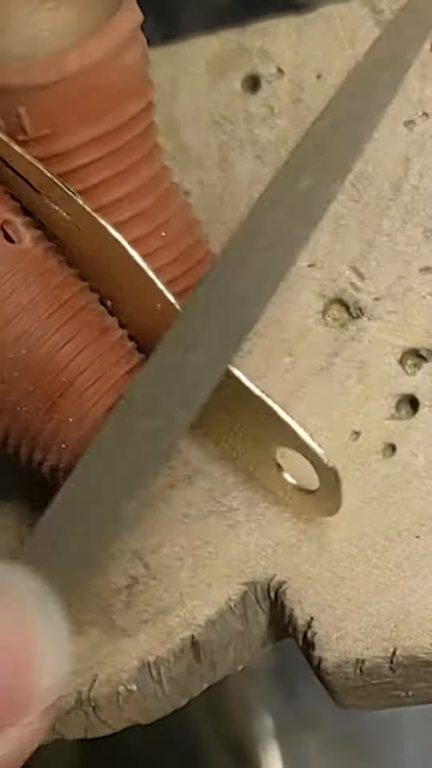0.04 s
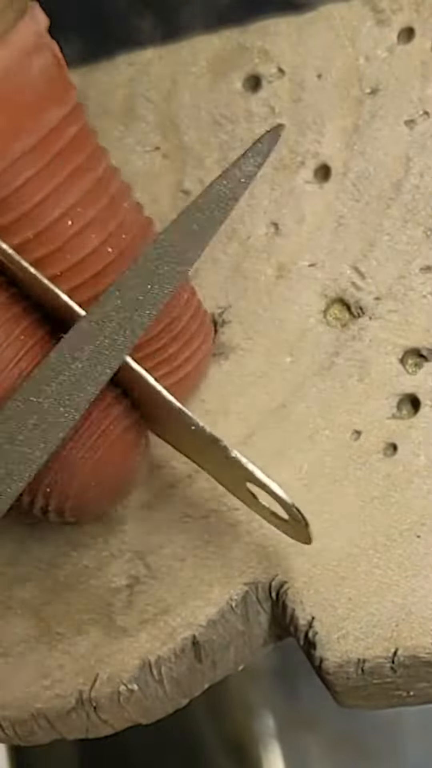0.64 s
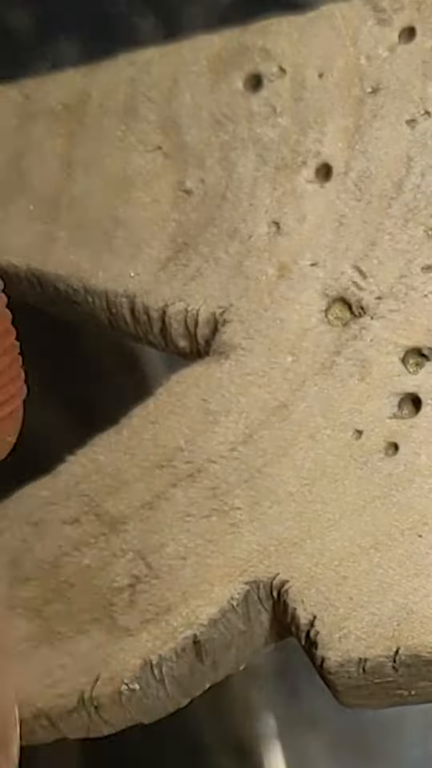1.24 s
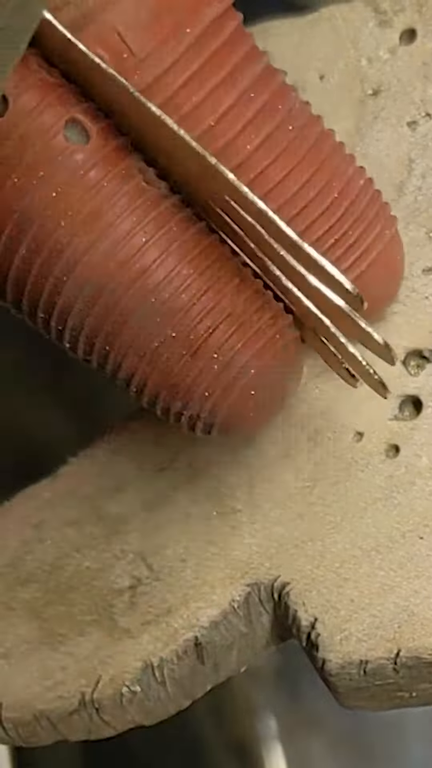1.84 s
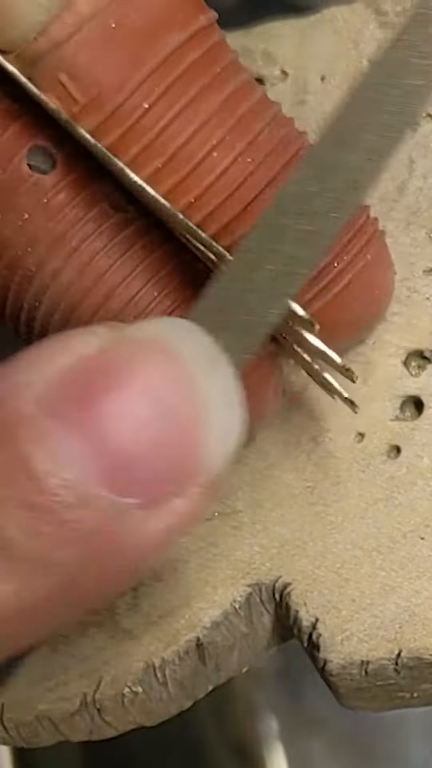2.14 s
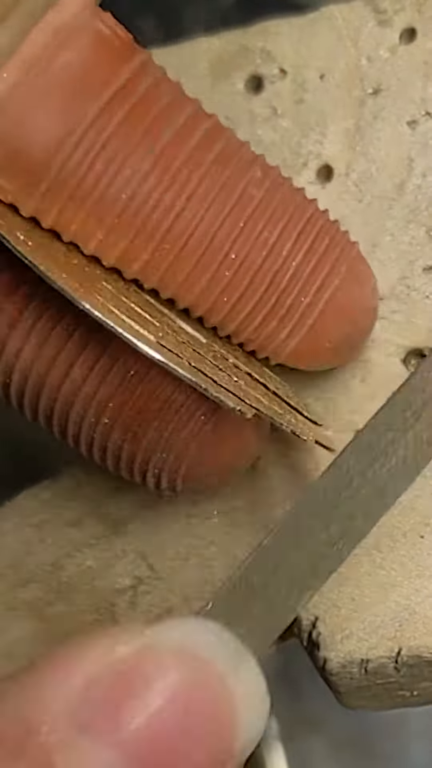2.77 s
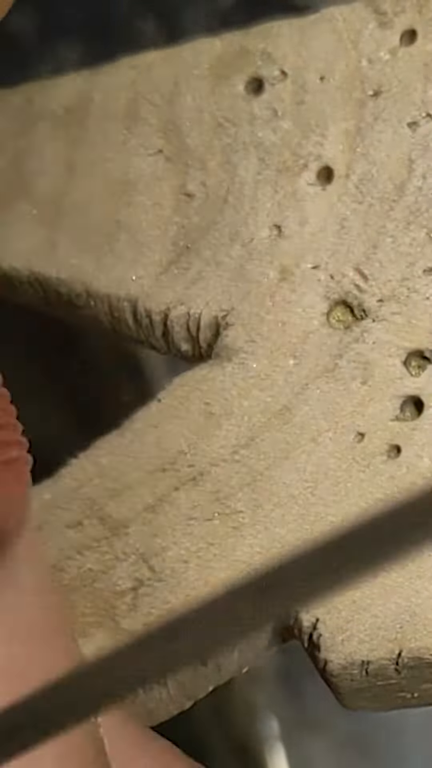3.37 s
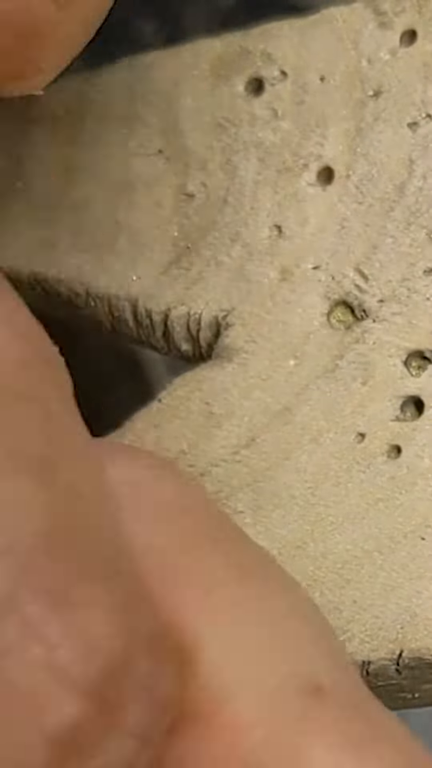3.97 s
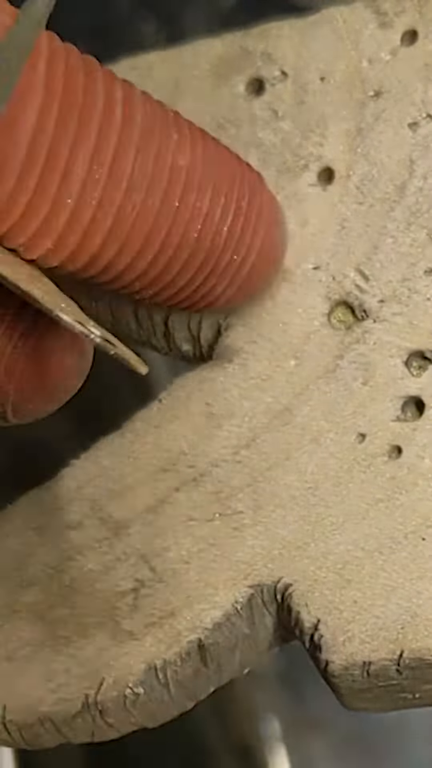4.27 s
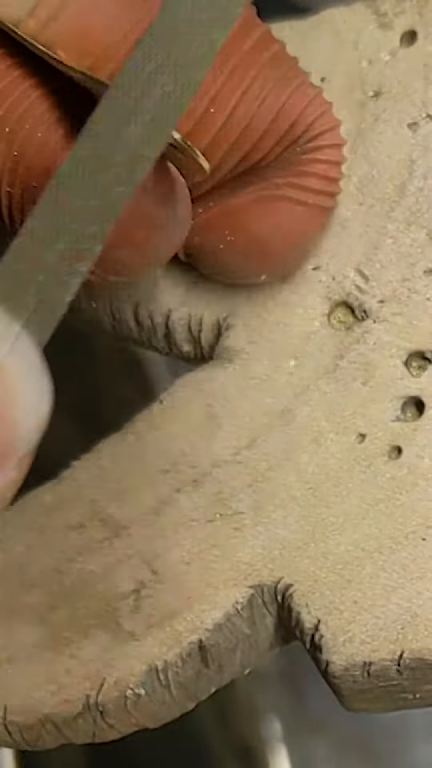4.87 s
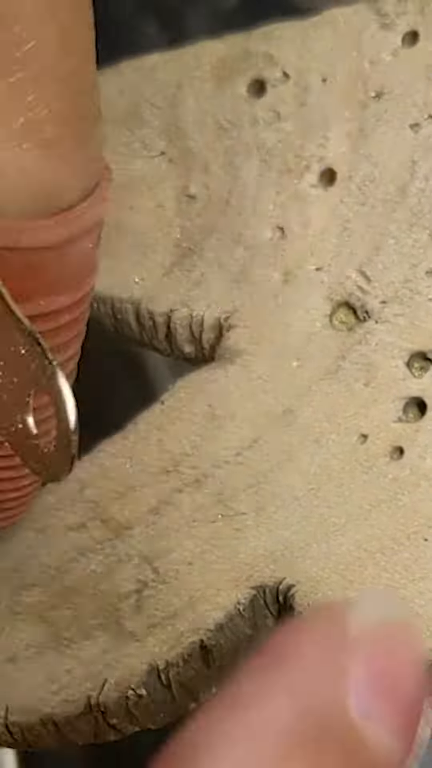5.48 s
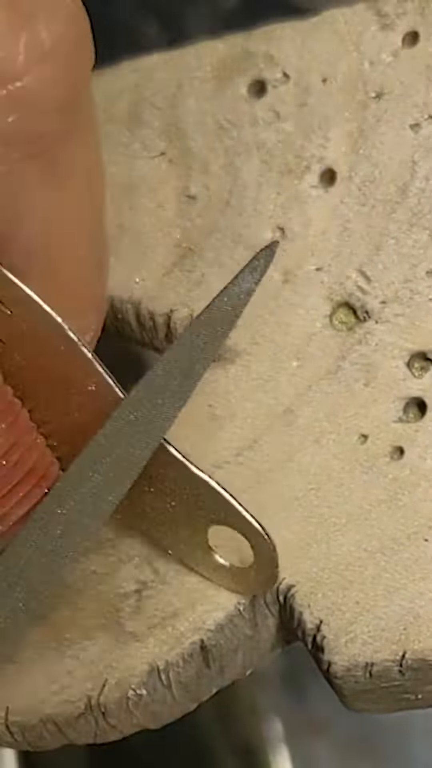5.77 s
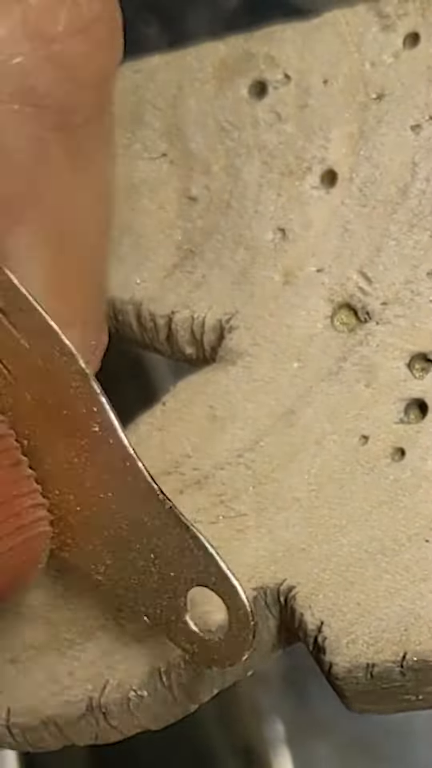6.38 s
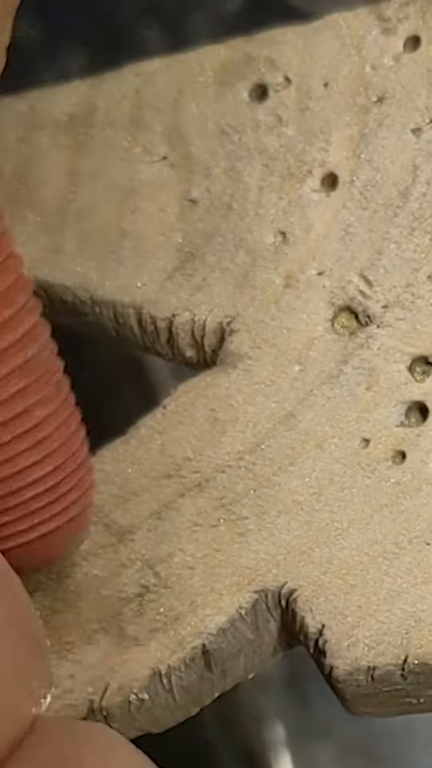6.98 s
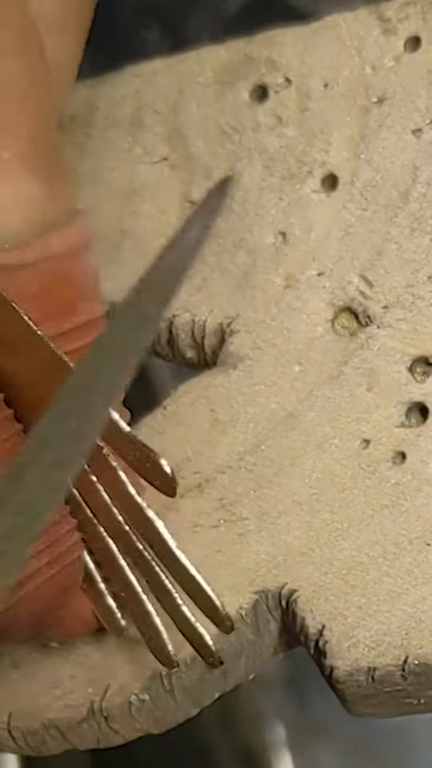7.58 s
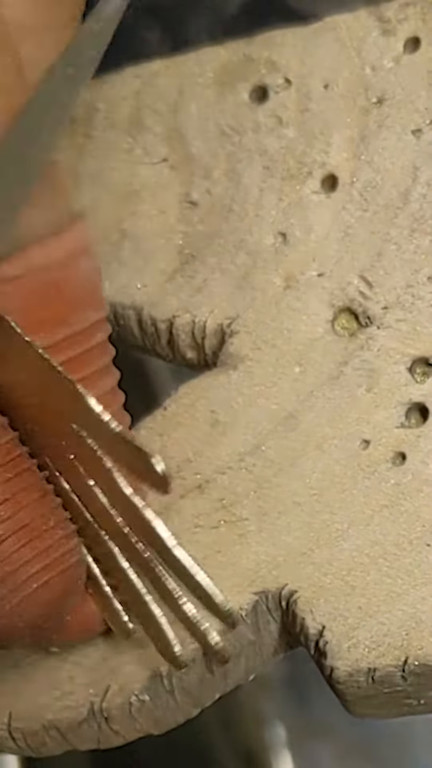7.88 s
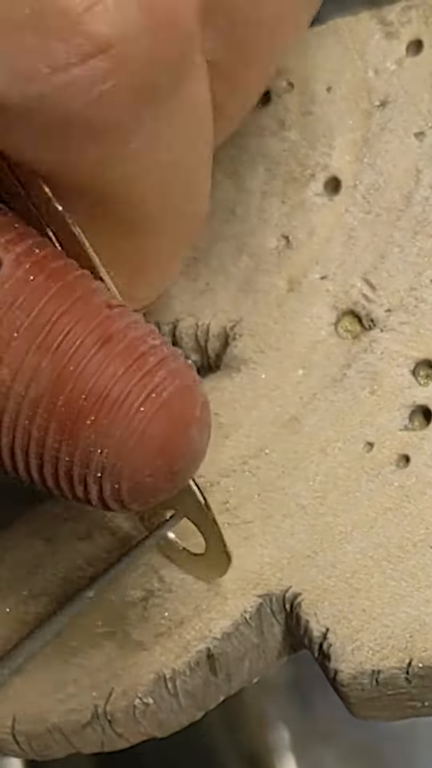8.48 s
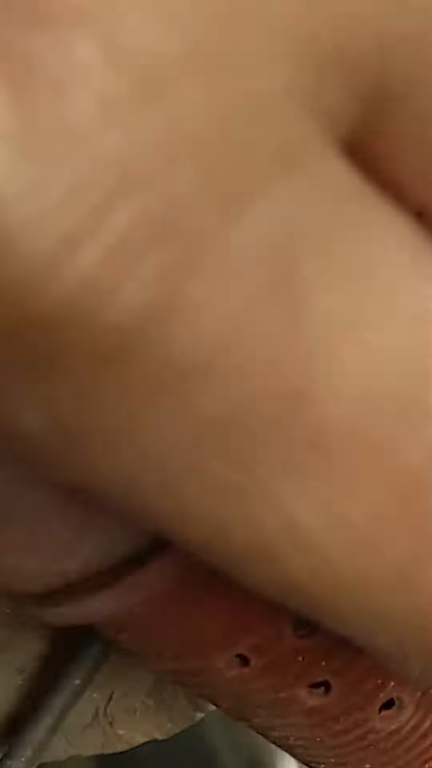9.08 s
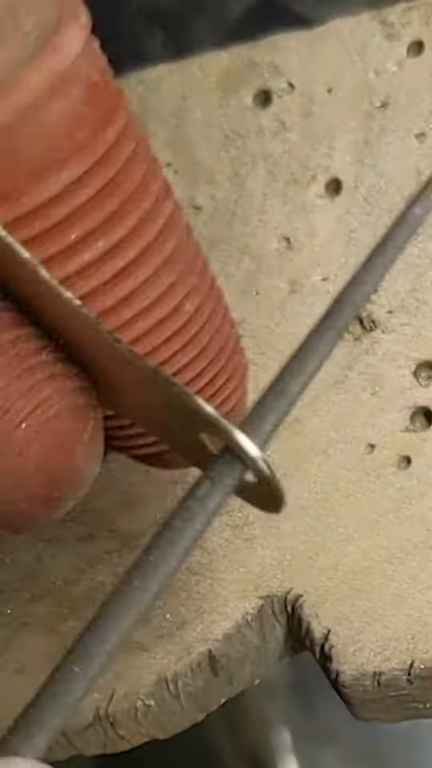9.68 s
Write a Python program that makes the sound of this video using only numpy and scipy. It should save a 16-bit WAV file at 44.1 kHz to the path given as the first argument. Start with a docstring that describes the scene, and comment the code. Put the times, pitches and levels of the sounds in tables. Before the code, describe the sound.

A needle file rasps a small brass piece on a wooden bench pin, close up, over quiet workshop air. Quick, bright, hissing strokes, about nine a second, run from the start to 1.2 seconds, with a slight metallic ring, tiny zips and light wooden knocks. A second burst runs from 1.8 to 3.1 seconds. Softer, scattered strokes follow from 3.6 to 5 seconds, with a sharper knock near 3.9. The piece drags briefly on the wood at 5.2. Filing returns with a squeaky edge from 5.9 to 6.4 seconds, then after a pause from 7.5 to 8.2. A low thump lands at about 8.1 seconds, and a faint rumble swells and slowly eases. From 8.5 to 9.6 seconds a round file scrapes to and fro inside a hole in the piece, its teeth singing, crackling and catching, rising in pitch at the end.

```python
"""Quick bursts of close, bright rasping: a needle file works a small brass piece on a wooden bench pin.
The teeth hiss as they cut, the piece rings, the pin resounds; some strokes end in a zip or a knock.
Between bursts the piece is dragged over the pin. Late on comes a low thump, a rumble swells, and a
round file scrapes to and fro inside a hole in the piece, its teeth singing and catching."""
import sys
import numpy as np
from scipy import signal
from scipy.fft import rfft, irfft
from scipy.io import wavfile
from scipy.ndimage import uniform_filter1d

SR = 44100
rng = np.random.default_rng(int(sys.argv[2]) if len(sys.argv) > 2 else 0)


def log_audio(samples):
    """Write samples as a 16-bit WAV file to the path given in sys.argv[1]."""
    # one column per channel
    frames = np.atleast_2d(samples).T
    # limit to full scale, then quantise
    limited = np.clip(frames, -1, 1)
    pcm = np.round(limited * 32767).astype(np.int16)
    wavfile.write(sys.argv[1], SR, pcm)


N = 428652
TIME = np.arange(N) / SR
FREQ = np.fft.rfftfreq(N, 1 / SR)
TAP_FREQ = np.fft.rfftfreq(4096, 1 / SR)  # coarser axis for short filters
EDGE_HZ = 16250  # top of the treble

# quick strokes of the needle file: start/s, length/s, hiss level/dB
STROKES = [(0.059, 0.056, -42.5), (0.176, 0.055, -43), (.345, 0.056, -46), (0.453, 0.06, -48),
           (0.592, 0.048, -47), (0.687, 0.045, -48), (0.951, 0.052, -46), (1.057, 0.035, -46.5),
           (1.214, 0.023, -54), (1.793, 0.07, -42), (1.927, 0.071, -44), (2.048, 0.054, -43.5),
           (2.153, 0.052, -45.5), (2.257, 0.038, -45), (2.347, 0.036, -47.5), (2.436, 0.06, -40),
           (2.551, 0.057, -42.5), (2.666, 0.065, -52.5), (2.776, 0.044, -49), (2.873, 0.044, -42.5),
           (2.971, 0.045, -38.5), (3.086, 0.051, -43), (3.594, 0.065, -49), (3.717, 0.031, -47),
           (3.803, 0.014, -46), (3.864, 0.017, -49), (4.319, 0.054, -51.5), (4.426, 0.033, -46.5),
           (4.508, 0.051, -52.5), (4.62, 0.044, -49.5), (4.74, 0.039, -55.5), (4.829, 0.037, -55.5),
           (4.914, 0.029, -47.5), (5.869, 0.059, -44), (5.986, 0.054, -48.5), (6.099, 0.055, -50.5),
           (6.231, 0.062, -43.5), (6.341, 0.048, -42), (7.532, 0.072, -42), (7.66, 0.062, -46),
           (7.78, 0.073, -43), (7.91, 0.062, -45.5), (8.023, 0.05, -46.5), (8.131, 0.043, -49.5)]
# colour of the teeth's hiss: f/Hz, relative level/dB
HISS_COLOUR = [(2000, -22), (5000, -6.5), (6800, -6), (8700, 2.5), (9900, -6), (11800, -3.5), (15600, -3.5)]


def amp(db):
    """Decibels to gain."""
    return 10 ** (np.asarray(db) / 20)


def unit(x):
    """Scales to rms 1."""
    return x / np.sqrt(np.mean(x ** 2) + 1e-20)


def read(points, hz):
    """Reads a spectrum table on a log-frequency axis."""
    f, value = np.transpose(points)
    return np.interp(np.log(hz + 1), np.log(f + 1), value)


def add(mix, s, sound):
    """Mixes a sound in at time s."""
    part = mix[max(round(s * SR), 0):][:len(sound)]
    part += sound[:len(part)]


def noise(gain):
    """Steady noise of rms 1, coloured by a gain curve."""
    return unit(irfft(rfft(rng.standard_normal(N)) * gain, N))


def drift(hz):
    """Random modulation of rms 1, up to about the given rate."""
    knots = np.arange(0, N / SR + 1, .5 / hz)
    return unit(np.interp(TIME, knots, rng.standard_normal(N)[:len(knots)]))


def flutter(count):
    """Fast random modulation of rms 1."""
    return unit(uniform_filter1d(rng.standard_normal(count), size=12))


def band(hz, lo_hz, hi_hz, order=4):
    """Gain of a smooth band-pass."""
    return 1 / np.sqrt((1 + (lo_hz / (hz + 1)) ** (2 * order)) * (1 + (hz / hi_hz) ** (2 * order)))


def response(gain):
    """Minimum-phase impulse response of energy 1, coloured by a gain curve."""
    log_gain = np.log(np.maximum(gain / gain.max(), 1e-5))
    mirrored = np.r_[log_gain, log_gain[-2:0:-1]]
    taps = np.fft.ifft(np.exp(np.conj(signal.hilbert(mirrored)))).real
    return taps / np.linalg.norm(taps)


def body(shift=1, width_hz=65, loss=0.008):
    """Resonant colour of pin and piece; the grip shifts the piece's high modes more than the pin's."""
    # resonances of the pin and the piece on it: f/Hz, level/dB
    modes = [(430, -7), (735, -1), (830, 1), (915, 0.5), (1140, 0.5), (1290, -3), (1425, -2), (1810, 2),
             (2120, 0.5), (2380, -3.5), (3050, -4.5), (3730, -3), (3990, -5.5), (4610, -11)]
    power = 0
    for hz, db in modes:
        centre = hz * shift ** (hz / modes[-1][0])
        power += amp(2 * db) / (1 + (2 * (TAP_FREQ - centre) / (width_hz + loss * hz)) ** 2)
    return np.sqrt(power)


def ripple(depth_db, bins=24):
    """Random narrow peaks and dips: the many fine modes that one point of contact favours."""
    bumps = uniform_filter1d(rng.standard_normal(len(TAP_FREQ)), bins)
    return amp(depth_db * unit(uniform_filter1d(bumps, bins // 2)))


def contact(force, pressure, colour):
    """Friction sounds a colour whose fine peaks shift as the contact travels; pressure sets the rms."""
    travel = np.linspace(0, np.pi / 2, len(force))
    sound = sum(signal.fftconvolve(force * pressure * fade, response(colour * ripple(depth_db=3.5)))
                for fade in (np.cos(travel) ** 2, np.sin(travel) ** 2))
    return sound * np.linalg.norm(pressure) / np.linalg.norm(sound)


def grit(count, per_s, spread_db):
    """Random impulses of uneven size: tiny fractures under the teeth, or slips on wood."""
    size = amp(spread_db * np.minimum(rng.exponential(1, count), 4))
    return unit(size * rng.standard_normal(count) * (rng.random(count) < per_s / SR))


def room_tone(air_db=-63, widen_hz=900):
    """Quiet workshop air, centred in the bass and wide in the treble, with a faint hum."""
    # colour of the air: f/Hz, relative level/dB
    air_colour = [(20, -20), (52, -3.5), (92, 0.5), (190, -9), (245, -22), (310, -12), (400, -20.5),
                  (1500, -29.5), (7500, -37.5), (10000, -41), (14000, -38.5)]
    # tones of the hum: f/Hz, level/dB
    hum_tones = [(285.3, -79.5), (1085, -88)]
    colour = amp(read(air_colour, FREQ))
    mid = noise(colour)
    width = 0.0044 + 1.04 * FREQ / (FREQ + widen_hz)
    side = np.array([[1], [-1]]) * irfft(rfft(noise(colour)) * width, N)
    hum = sum(amp(db) * np.sqrt(2) * np.sin(2 * np.pi * hz * TIME + .5 * drift(1.4))
              for hz, db in hum_tones)
    return amp(air_db) * (mid + side) + hum


def handling(level_db=-78.5, swell_db=6):
    """Gloved fingers shift the piece on the pin: faint, clumped wooden rubbing and ticking."""
    slips = grit(N, per_s=300, spread_db=2.5) * amp(swell_db * np.minimum(drift(23.3), 2))
    colour = body() * band(TAP_FREQ, 370, 1100, order=2) + 0.088 * amp(read(HISS_COLOUR, TAP_FREQ))
    return amp(level_db) * unit(signal.oaconvolve(slips, response(colour))[:N])


def grip_at(s):
    """The grip sets how freely the piece rings, how firmly it rests on the pin and how the file skids."""
    # grips, each held until the next: t/s, ring over hiss/dB, pin at a usual stroke/dB, zip over hiss/dB
    grips = [(0, -3, -49, 7), (.3, -6, -48.5, 2), (.85, -11, -56.5, 8.5), (1.15, -39, -81, -8),
             (1.5, -9.5, -50.5, -0.5), (2.84, -4.5, -50.5, -5), (3.4, -19.5, -62, -3.5), (4.7, 0.5, -45, 3),
             (5.5, -3.5, -47.5, 2), (7.3, -10.5, -48.5, 0.5)]
    return grips[sum(row[0] < s for row in grips[1:])][1:]


def tooth_tone(rate_hz, jitter):
    """Unevenly spaced teeth strike at a gliding rate: a fuzzy whistle and its octave."""
    phase = 2 * np.pi * np.cumsum(rate_hz * (1 + jitter * flutter(len(rate_hz)))) / SR
    strength = 1 + .5 * flutter(len(rate_hz))
    return strength * (np.sin(phase) + .5 * np.sin(2 * phase) * (rate_hz < SR / 4))


def filing(first_hz=6200, last_hz=9800, teeth_db=-9, skid_db=2, catch_db=2, split_hz=1300):
    """Each stroke speeds up: teeth sing, chips drive hiss, piece and pin, and the skid-off brightens."""
    bite, hold, crest_share, release_s = 0.29, 0.89, 0.49, 0.014
    pace_octaves, grip_spread = .15, 0.045  # variation from stroke to stroke
    usual_db, pin_follows = -43, 0.57  # the pin follows only this share of a stroke's dB over the usual
    out, hiss = np.zeros(N), amp(read(HISS_COLOUR, TAP_FREQ))
    catching = amp(catch_db * drift(80))
    for start, length, hiss_db in STROKES:
        free_db, firm_db, _ = grip_at(start)
        ring_db = hiss_db + free_db
        pin_db = firm_db + pin_follows * (hiss_db - usual_db)
        crest, end = start + crest_share * length, start + length
        t = np.arange(start, end, 1 / SR)
        # bite, swell to the crest, ease a little, lift off
        pressure = np.interp(t, [start, crest, max(crest, end - release_s), end], [bite, 1, hold, 0])
        pressure *= np.interp(t, TIME, catching)
        skid = pressure * ((t - start) / length) ** 4
        chips = grit(len(t), per_s=7000, spread_db=3.5)
        pace = 2 ** (pace_octaves * rng.standard_normal())
        teeth = tooth_tone(np.geomspace(first_hz, last_hz, len(t)) * pace, jitter=.2)
        modes = body(shift=1 + grip_spread * rng.standard_normal()) + .22
        add(out, start, amp(hiss_db) * contact(chips + amp(teeth_db) * teeth, pressure, hiss))
        add(out, start, amp(hiss_db + skid_db) * contact(chips, skid, band(TAP_FREQ, 11500, EDGE_HZ)))
        add(out, start, amp(ring_db) * contact(chips, pressure, modes * band(TAP_FREQ, split_hz, 4300)))
        wood = modes * band(TAP_FREQ, 494, split_hz, order=3)
        add(out, start, amp(pin_db) * contact(chips, pressure, wood))
    return out


def touches(decay_s=0.0034):
    """Small bright ticks of steel on brass."""
    # the file touches down or a tooth catches: t/s, level/dB
    ticks = [(0.0672, -37.5), (2.0433, -49), (2.259, -45), (2.3496, -45), (2.5515, -44), (2.978, -35.5),
             (5.057, -56), (5.188, -48), (5.9838, -47), (6.3363, -53), (7.518, -41), (9.168, -42),
             (9.27, -38)]
    out, t = np.zeros(N), np.arange(SR // 50) / SR
    for s, db in ticks:
        add(out, s, amp(db) * rng.standard_normal(len(t)) * np.exp(-t / decay_s))
    return signal.oaconvolve(out, response(amp(read(HISS_COLOUR, TAP_FREQ)) + .5 * body()))[:N]


def zips(hz=10400, length_s=0.011, lead_s=.012, rise_octaves=0.924, spread_octaves=.15, wobble=0.11):
    """Just before a stroke ends the file skids: its teeth strike fast, in a short rising whistle."""
    out, sweep = np.zeros(N), np.linspace(-.5, .5, int(length_s * SR))
    envelope = np.sqrt(2) * np.cos(np.pi * sweep) ** 4
    for (start, stroke_s, hiss_db), detune in zip(STROKES, rng.standard_normal(len(STROKES))):
        _, _, zip_db = grip_at(start)
        middle = start + max(stroke_s - lead_s, stroke_s / 2)
        rate_hz = hz * 2 ** (rise_octaves * sweep + spread_octaves * detune)
        rate_hz *= 1 + wobble * flutter(len(sweep))
        whistle = np.sin(2 * np.pi * np.cumsum(rate_hz) / SR)
        add(out, middle - length_s / 2, amp(hiss_db + zip_db) * envelope * whistle)
    return out


def knocks(chatter_s=0.0045, boost_db=25):
    """A blow and a few milliseconds of chatter ring the pin and the piece."""
    # the piece or the file hits the pin: t/s, relative level/dB, ring of the piece over the pin/dB
    blows = [(.226, -38, 5), (0.6301, -34, -2), (0.991, -32.5, 4), (1.0795, -34, 7), (2.1881, -40.5, 2.5),
             (2.2853, -42, -3.5), (2.7074, -32, 1), (3.483, -55.5, -8), (3.8785, -24, -4),
             (4.118, -56.5, -11), (4.6901, -44.5, -19.5), (4.9382, -39, -1.5), (6.38, -45.5, 8),
             (9.272, -42, 3)]
    out, t = np.zeros(N), np.arange(SR // 40) / SR
    pin = body() * band(TAP_FREQ, 504, 980)
    piece = body() * band(TAP_FREQ, 2400, 4700, order=2)
    for s, db, piece_db in blows:
        chatter = .22 * rng.standard_normal(len(t)) * np.exp(-t / chatter_s)
        chatter[0] = 1  # the blow itself
        push = rfft(chatter, SR)
        force = irfft(push / np.sqrt(abs(push)))[:len(t)]  # a hard contact has a nearly flat spectrum
        knock = signal.fftconvolve(force, response(np.hypot(pin, amp(piece_db) * piece)))
        add(out, s, amp(db + boost_db) * knock / np.linalg.norm(knock))
    return out


def rubbing(crest_share=0.87, hiss_db=-14):
    """A slow drag builds and lets go: small slips sound the wood, with a trace of hiss."""
    # the piece is repositioned on the pin: start/s, length/s, level/dB
    drags = [(1.601, 0.11, -64.5), (5.224, 0.088, -46.5), (5.77, 0.085, -56), (8.378, 0.04, -46.5),
             (9.145, 0.035, -41)]
    out, hiss = np.zeros(N), amp(read(HISS_COLOUR, TAP_FREQ))
    wood = body() * band(TAP_FREQ, 390, 1250, order=2)
    for start, length, db in drags:
        pressure = np.interp(np.arange(0, length, 1 / SR), [0, crest_share * length, length], [.15, 1, 0])
        slips = grit(len(pressure), per_s=3900, spread_db=4.0)
        drag = contact(slips, pressure, wood) + amp(hiss_db) * contact(slips, pressure, hiss)
        add(out, start, amp(db) * drag)
    return out


def scraping(slowest=0.42, hissy_hz=5000, hiss_db=-1, pin_db=-9, catch_db=2.5, jerk_octaves=.1):
    """The teeth sing in a jerky arch as the file speeds up and slows; faster scrapes hiss more."""
    # scrapes on the edge, then from 8.5 s to and fro in the hole:
    # start/s, length/s, level/dB, mid-scrape f/Hz, glide/octaves
    scrapes = [(5.875, .056, -43, 2908, 1.17), (5.989, 0.047, -42.5, 4300, 0.23),
               (6.096, 0.062, -42, 3995, -.4), (7.044, .032, -51.5, 2015, -0.24),
               (8.532, 0.071, -44, 2302, 1.57), (8.598, 0.044, -48.5, 4730, -0.18),
               (8.644, 0.056, -42.5, 5090, 0.62), (8.699, 0.042, -45, 5010, 0.2),
               (8.744, .054, -43, 3400, 0.37), (8.904, 0.053, -50, 5430, 0.041),
               (8.964, 0.052, -47, 3440, 0.59), (9.013, 0.037, -42, 4910, .6),
               (9.056, 0.045, -46, 3080, 0.19), (9.098, 0.041, -41.5, 4900, .3),
               (9.425, .063, -50, 7020, .5), (9.489, .036, -40.5, 7360, 0.75),
               (9.559, 0.029, -41.5, 9020, 1), (9.59, 0.044, -46.5, 10460, 1.05)]
    out, hiss = np.zeros(N), amp(read(HISS_COLOUR, TAP_FREQ))
    catching = amp(catch_db * drift(80))
    jerks = jerk_octaves * drift(110)
    wood = body() * band(TAP_FREQ, 440, 2800, order=2)
    for start, length, db, hz, glide in scrapes:
        t = np.arange(start, start + length, 1 / SR)
        progress = (t - start) / length
        speed = np.sin(np.pi * progress)
        pressure = (0.13 + speed) * np.interp(t, TIME, catching)
        bend = 2 ** (glide * (progress - .5) + np.interp(t, TIME, jerks))
        arch = slowest + (1 - slowest) * np.sqrt(abs(speed))
        teeth = tooth_tone(hz * bend * arch, jitter=.13)
        chips = grit(len(t), per_s=2200, spread_db=2.5)
        hiss_share = hz ** 2 / (hz ** 2 + hissy_hz ** 2)
        song = np.sqrt(1 - .5 * hiss_share) * contact(teeth, pressure, .7 * body() + hiss + .35)
        rasp = np.sqrt(hiss_share) * contact(chips, pressure, hiss * band(TAP_FREQ, hz, EDGE_HZ))
        pin = contact(chips, np.sqrt(pressure), wood)
        add(out, start, amp(db) * (song + amp(hiss_db) * rasp + amp(pin_db) * pin))
    return out


def thump(s=8.0634, level_db=-22.0, start_hz=31, decay_s=.02028, rise_s=0.000081):
    """A sudden low push of pressure that swings back once, a little left of centre."""
    out, t = np.zeros(N), np.arange(SR // 8) / SR
    envelope = (1 - np.exp(-t / rise_s)) * np.exp(-(t / decay_s) ** 2)
    swing = -np.cos(2 * np.pi * start_hz * t / (1 + 9 * t))
    add(out, s, amp(level_db) * envelope * swing)
    return out * amp([[1], [-1.5]])


def rumble(hz=112, width_hz=45):
    """A narrow band of low noise swells just after the thump and slowly eases."""
    # envelope of the rumble: t/s, level/dB
    swell = [(8.1, -101), (8.22, -55), (9.7, -63)]
    colour = 1 / (1 + (2 * (FREQ - hz) / width_hz) ** 2) ** 0.64
    return amp(np.interp(TIME, *np.transpose(swell))) * noise(colour)


def crackling(start_s=8.44, end_s=9.63, level_db=-56, count=60, decay_s=.008):
    """The round file stays in the hole: teeth catch and let go, each with its own strength and colour."""
    out = np.zeros(N)
    colour = amp(read(HISS_COLOUR, TAP_FREQ)) + body() * band(TAP_FREQ, 600, SR, order=2)
    pressure = np.exp(-np.arange(SR // 25) / SR / decay_s)
    for k, (late, strength) in enumerate(rng.random((count, 2))):
        s = start_s + (end_s - start_s) * (k + late) / count
        slip = contact(grit(len(pressure), per_s=3000, spread_db=3), pressure, colour)
        add(out, s, amp(level_db) * 2 * strength ** 2 * slip)
    return out


def reflections(x, t60_s):
    """Dense dying echoes of a sound, different left and right."""
    t = np.arange(int(t60_s * SR)) / SR
    taps = rng.standard_normal((2, len(t))) * amp(-60 * t / t60_s)
    taps /= np.linalg.norm(taps, axis=1, keepdims=True)
    return signal.oaconvolve(x[None], taps, axes=1)[:, :N]


def workshop(x, scatter_db=-1.0, room_db=-21):
    """Moving hands scatter the treble along shifting paths; the room adds a faint tail."""
    treble = irfft(rfft(x) * band(FREQ, 2600, SR, order=2), N)
    paths = np.array([drift(5) for _ in range(4)])
    paths /= np.linalg.norm(paths, axis=0)  # the paths trade strength at even total power
    scatter = sum(path * reflections(treble, t60_s=.016) for path in paths)
    return x + amp(scatter_db) * scatter + amp(room_db) * reflections(x, t60_s=0.15)


def ports(x):
    """Stereo image: the two microphone ports differ in level and phase."""
    # left over right: f/Hz, level/dB
    balance = [(400, -1.5), (2200, 5), (4700, 4), (8300, 4), (11000, -2.5)]
    # how far the left port leads: f/Hz, phase/rad
    lead = [(700, 0.45), (3500, 0.1), (6800, 0.7), (9400, -1), (10400, 2.5), (12500, 1.5), (13500, 4.5)]
    left = amp(read(balance, FREQ) / 2) * np.exp(.5j * read(lead, FREQ))
    return irfft(rfft(x) * np.array([left, 1 / left]), N)


def scene():
    """The bench work in its room, over room tone, thump and rumble."""
    work = filing() + scraping() + crackling() + rubbing() + zips() + knocks() + touches() + handling()
    return ports(workshop(work)) + room_tone() + thump() + rumble()


def record(dry):
    """A steep low-pass trims the highest treble."""
    low_pass = signal.firwin(401, EDGE_HZ, window=("kaiser", 8), fs=SR)
    return signal.oaconvolve(dry, low_pass[None], "same")


dry = scene()
out = record(dry)
log_audio(out)
```